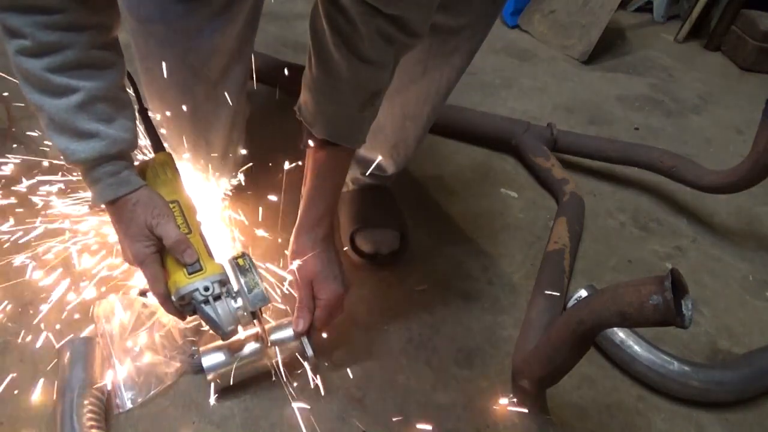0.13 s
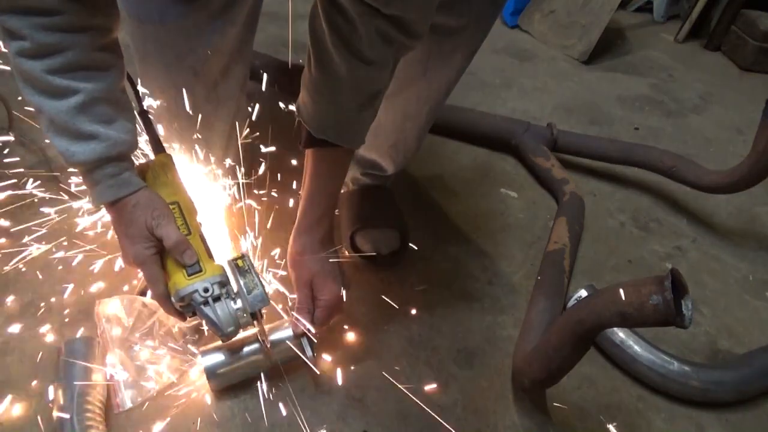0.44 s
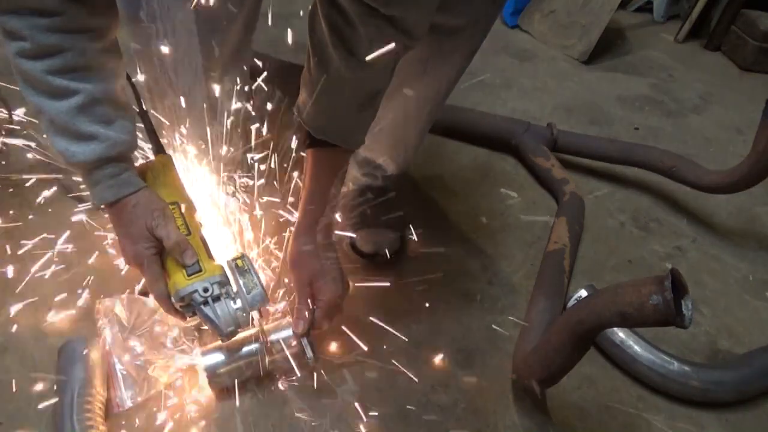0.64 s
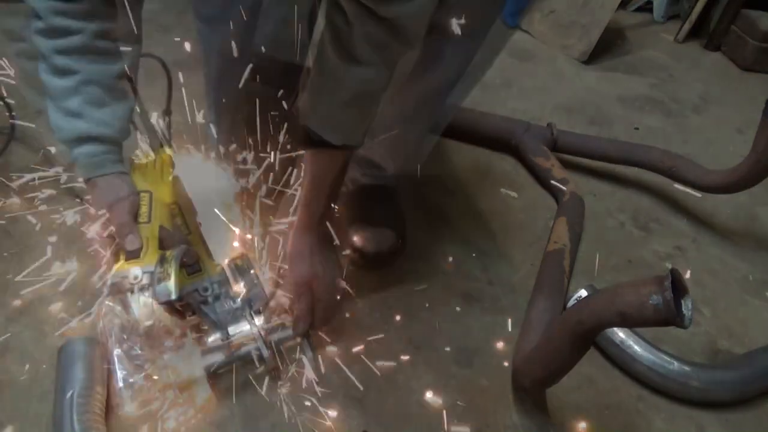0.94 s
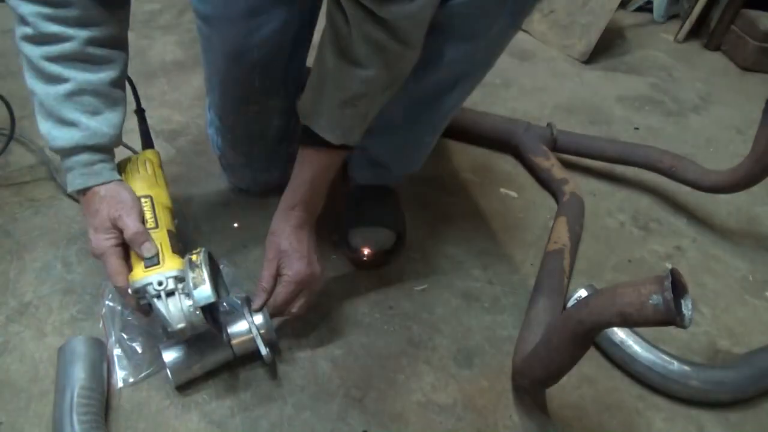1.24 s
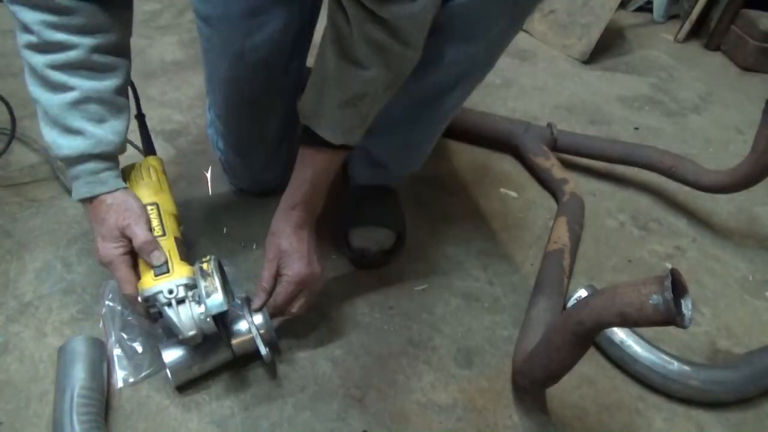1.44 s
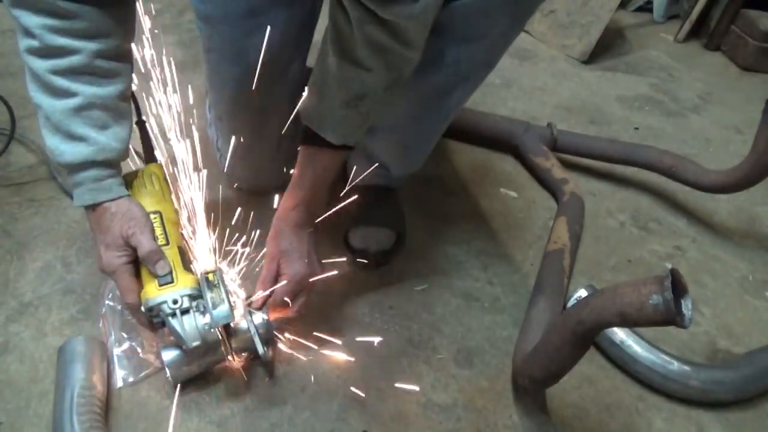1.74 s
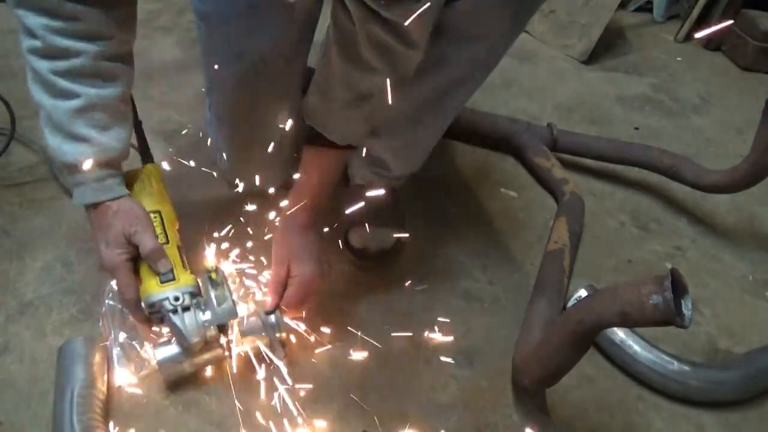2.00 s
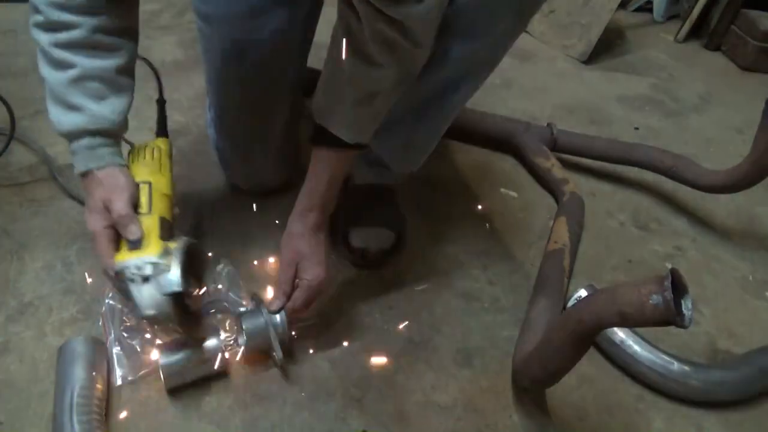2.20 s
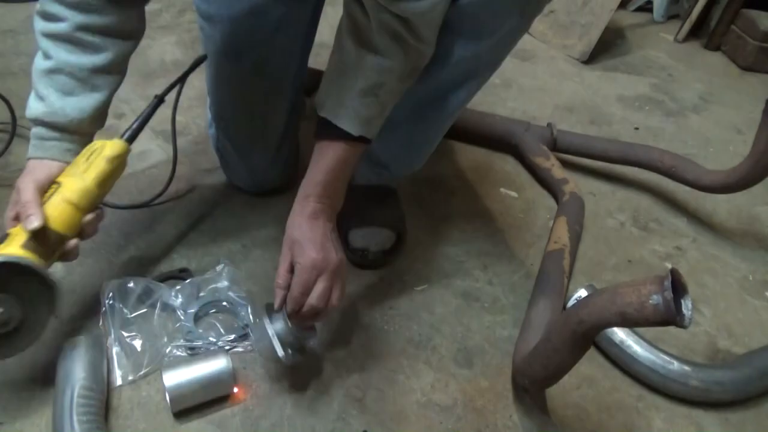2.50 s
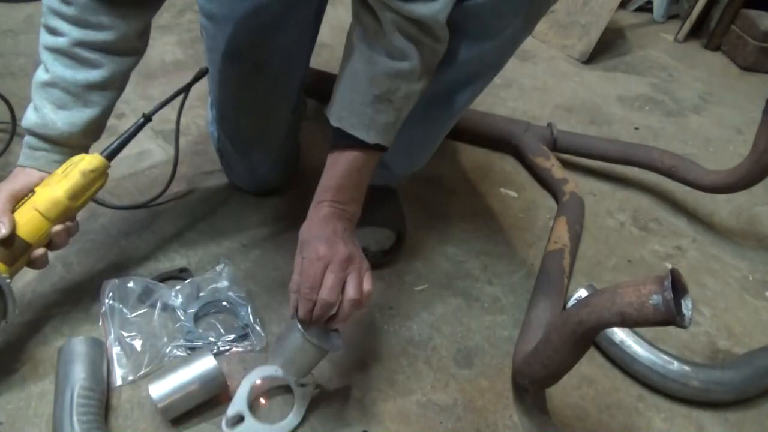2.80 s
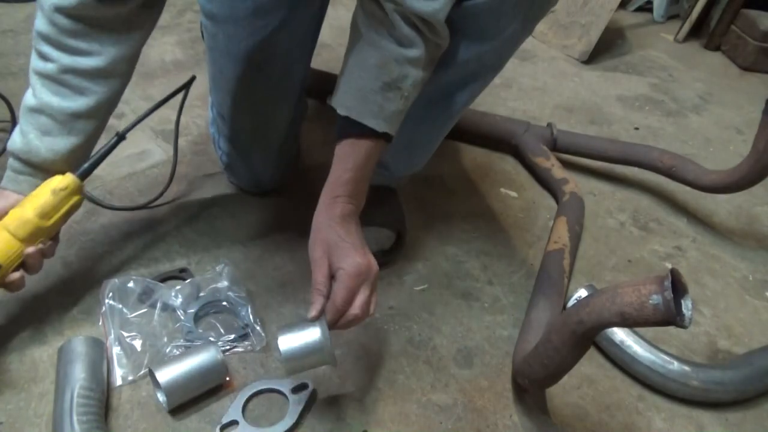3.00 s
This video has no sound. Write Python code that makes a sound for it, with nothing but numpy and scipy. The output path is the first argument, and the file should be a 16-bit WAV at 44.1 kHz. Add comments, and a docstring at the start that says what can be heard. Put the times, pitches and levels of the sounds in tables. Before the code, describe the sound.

Close up in a garage, gritty, bright steel cutting gives way to a rising motor whine, one short squealing bite, then rushing fan air and the bell-like clinks of metal pieces hitting the floor.

```python
"""A garage floor: an angle grinder cuts a steel pipe flange. A deep cut with the motor labouring dissolves
into a second pass: the motor speeds up, sags in one last bite, then runs free with its fan rushing.
Cutting is repeating rim grit and random chips through steel resonances; the motor is sines locked to its speed.
The freed pieces drop on the concrete as decaying modes and noise cracks; gain control ducks loud moments."""
import sys
import numpy as np
from scipy import signal
from scipy.fft import rfft, irfft
from scipy.io import wavfile
from scipy.ndimage import uniform_filter1d, map_coordinates

SR = 44100
rng = np.random.default_rng(int(sys.argv[2]) if len(sys.argv) > 2 else 0)


def to_wav(s):
    """Save 16-bit WAV."""
    ch = np.atleast_2d(s).T  # columns
    pcm = np.round(np.clip(ch, -1, 1) * 32767)  # PCM
    wavfile.write(sys.argv[1], SR, pcm.astype(np.int16))


N = 138915
TIME = np.arange(N) / SR
FREQS = np.maximum(np.fft.rfftfreq(N, 1 / SR), 1)
GEAR_RATIO = 3.565  # motor turns per wheel turn
GUARD_HZ, GUARD_WIDTH_HZ = 4805, 70


def from_db(db):
    """Decibels to gain."""
    return np.exp(np.asarray(db) * (np.log(10) / 20))


def rms_one(x):
    """Scale to rms 1."""
    return x / np.sqrt(np.mean(x ** 2) + 1e-20)


def in_time(rows):
    """Each column of a curve at every sample."""
    s, *columns = np.transpose(rows)
    return [np.interp(TIME, s, c) for c in columns]


def during(rows):
    """1 over the span of a curve, fading quickly outside it."""
    start, end = rows[0][0], rows[-1][0]
    return np.interp(TIME, [start - .06, start - .03, end + .03, end + .06], [0, 1, 1, 0])


def spell(start, end):
    """1 from start to end, with soft edges."""
    fade_s = .03
    return np.clip(np.minimum(TIME - start, end - TIME) / fade_s + .5, 0, 1)


def swells(rows):
    """Gain of a few bell-shaped swells."""
    return sum(from_db(db) * np.exp(-2 * ((TIME - s) / length) ** 2) for s, length, db in rows)


def at_hz(points):
    """A spectrum in dB at every frequency."""
    hz, db = np.transpose(points)
    return np.interp(np.log(FREQS), np.log(hz), db)


def bell(hz, width_hz):
    """Shape of a resonance, 1 on top."""
    return 1 / (1 + (2 * (FREQS - hz) / width_hz) ** 2)


def shaped(x, gain):
    """Filter by a gain per frequency; rms 1."""
    return rms_one(irfft(rfft(x) * gain, N))


def noise(gain):
    """Coloured noise of rms 1."""
    return shaped(rng.standard_normal(N), gain)


def drift(rate_hz):
    """Slow chance of spread 1, drawn at every 40th sample."""
    step = 40
    white = rng.standard_normal(4096)
    hz = np.fft.rfftfreq(len(white), step / SR)
    slow = rms_one(irfft(rfft(white) / (1 + (hz / rate_hz) ** 2)))
    return np.interp(np.arange(N) / step, np.arange(len(slow)), slow)


def motor_turns(speed, wobble=0.000844):
    """Turns of the motor since the start: the sum of a slightly unsteady speed."""
    return np.cumsum(in_time(speed)[0] * (1 + wobble * drift(23.7))) / SR


def wheel_throb(turns):
    """One sine cycle per turn of the geared-down wheel."""
    return np.sin(2 * np.pi * turns / GEAR_RATIO)


def rim(wheel_turns, memory, size):
    """Grit round the wheel's rim passes the steel once a turn, and wears a little each time."""
    memory = np.clip(memory, 0, .98)
    fresh = rng.standard_normal((int(wheel_turns[-1]) + 42, size))
    # one row per turn; 40 turns settle the filter
    grit = signal.lfilter([1], [1, -memory], fresh, axis=0)[40:].ravel()
    return rms_one(map_coordinates(grit, [wheel_turns * size], order=3, mode="nearest"))


def cut(turns, bite, colour, rings, squeals, throb_db, flutter_db, size):
    """Rim grit and a spray of chips excite the steel; the uneven wheel throbs once a turn."""
    spray_db = -6
    grit = rim(turns / GEAR_RATIO, .86, size)
    force = grit + from_db(spray_db) * rng.standard_normal(N)
    force = force * from_db(throb_db * wheel_throb(turns) + flutter_db * drift(39))
    body_db = at_hz(colour) + sum(db * bell(hz, width) for hz, width, db in rings)
    grinding = shaped(force, from_db(body_db)) * from_db(in_time(bite)[0]) * during(bite)
    return grinding + squeal(turns, squeals)


def squeal(turns, orders, slip_rad=.25):
    """High spots of the rim catch the steel at the same places on every turn, until they wear off."""
    angle = 2 * np.pi * turns / GEAR_RATIO
    total = 0
    for k, start, end, db in orders:
        tone = np.sin(round(k) * angle + slip_rad * drift(40))
        total = total + spell(start, end) * from_db(db) * tone
    return np.sqrt(2) * total


def deep_cut(turns):
    """First pass: rim grit through the resonances of pipe and wheel, with squeals at wheel multiples."""
    # Level of the wheel on the steel. Each row: time in seconds, level in dB.
    bite = [(0, -31), (.25, -30), (.5, -31), (.75, -29.5), (.95, -33.5), (1.1, -37), (1.28, -49)]
    # Colour of the grinding. Each row: frequency in Hz, level in dB.
    colour = [(50, -26), (110, -34), (300, -21), (900, -21), (1500, -17.5), (2200, -5.5), (3100, -2),
              (4300, -7.5), (5800, -2.5), (7500, 0.5), (9200, 2), (10500, -5), (12200, -9.5), (15800, -26)]
    # Resonances and the gaps between them. Each row: frequency in Hz, width in Hz, boost in dB.
    rings = [(2200, 50, 2), (3000, 140, 2.5), (3230, 120, 3.5), (3930, 200, 4), (4330, 350, -7),
             (4720, 180, 6), (5150, 400, -5), (5550, 170, 8.5), (6070, 90, 4), (6330, 120, -3),
             (6700, 160, 3), (7490, 90, 5), (8380, 80, 8), (9160, 170, 10), (9720, 330, -7),
             (10300, 400, 2), (11800, 100, 8), (12250, 550, -8), (12900, 380, 7)]
    # Squeals. Each row: multiple of the wheel rate, start in seconds, end in seconds, level in dB.
    squeals = [(13, 0, .15, -55), (19, .3, 1.0, -57), (20, .45, .9, -55), (26, 0, .3, -49),
               (31, .6, .8, -50), (50, .3, .65, -49), (55, .4, .62, -50), (57, .15, .45, -51),
               (83, .3, .95, -47), (89, 0, .35, -46)]
    return cut(turns, bite, colour, rings, squeals, throb_db=1, flutter_db=0.9, size=400)


def last_cut(turns):
    """Second pass: the same mechanism with a stronger throb and flutter and its own resonances."""
    # Level of the wheel on the steel. Each row: time in seconds, level in dB.
    bite = [(1.41, -69), (1.45, -48), (1.53, -34.5), (1.6, -33), (1.7, -35), (1.87, -33.5), (1.94, -36),
            (1.98, -63)]
    # Colour of the grinding. Each row: frequency in Hz, level in dB.
    colour = [(60, -26), (160, -24), (300, -20), (900, -18), (1600, -11), (2400, -1), (3000, 1.5),
              (3900, -3.5), (5000, -4), (6500, -2.5), (8700, 6.5), (10500, -3), (12500, -3.5), (15800, -15)]
    # Resonances and the gaps between them. Each row: frequency in Hz, width in Hz, boost in dB.
    rings = [(2460, 180, 4), (2980, 160, 3), (3220, 130, 4), (3550, 180, -4), (4250, 300, 3),
             (5480, 120, 7), (6430, 200, 5), (7440, 130, 7), (7750, 200, -4), (8110, 100, 4),
             (8790, 150, 3), (9080, 100, 4), (9450, 120, 3), (9930, 160, 4), (10550, 300, -3),
             (11150, 180, 6), (11550, 130, 5), (12100, 450, -5), (12620, 140, 8)]
    # Squeals. Each row: multiple of the wheel rate, start in seconds, end in seconds, level in dB.
    squeals = [(10, 1.68, 1.92, -50), (14, 1.59, 1.78, -48), (15, 1.72, 1.86, -46), (16, 1.84, 1.93, -47),
               (18, 1.59, 1.84, -42.5), (19, 1.7, 1.93, -45), (20, 1.82, 1.93, -45),
               (27, 1.69, 1.85, -47.5), (39, 1.67, 1.82, -48), (40, 1.72, 1.9, -42.5),
               (45, 1.64, 1.73, -45), (46, 1.76, 1.9, -48), (53, 1.67, 1.83, -44), (54, 1.55, 1.66, -47),
               (57, 1.8, 1.9, -45.5), (60, 1.67, 1.74, -45), (61, 1.73, 1.84, -46), (70, 1.66, 1.88, -50),
               (77, 1.66, 1.8, -53)]
    return cut(turns, bite, colour, rings, squeals, throb_db=2.5, flutter_db=1.4, size=270)


def chatter(turns, throb_db=4):
    """Short spells of the wheel's flank rattling in the slot: throbbing noise in a broad band."""
    # Spells of rattling. Each row: centre in seconds, length in seconds, level in dB.
    chatters = [(.04, 0.032, -48), (.17, .07, -43), (.26, .02, -47), (.296, 0.008, -34), (.345, .04, -43),
                (.587, 0.023, -39.5), (.72, 0.05, -39), (.776, 0.015, -35.5), (1.48, 0.018, -36.5),
                (1.625, 0.044, -37.5)]
    rattle = rng.standard_normal(N) * from_db(throb_db * wheel_throb(turns))
    return swells(chatters) * shaped(rattle, bell(2880, 2100) ** 2)


def singing(waver_db=1.5, slip_rad=.45):
    """Fixed-pitch modes of the nearly severed steel, kept ringing a little unevenly by the grit."""
    # Singing modes. Each row: start in seconds, end in seconds, frequency in Hz, level in dB.
    sings = [(1.6, 1.93, 3010, -45.5), (1.73, 1.96, 5480, -41), (1.655, 1.8, 8135, -43),
             (1.82, 1.92, 8110, -47), (1.78, 1.94, 7480, -49), (1.42, 1.54, 8740, -47),
             (1.92, 1.98, 8620, -46)]
    total = 0
    for start, end, hz, db in sings:
        level = spell(start, end) * from_db(db + waver_db * drift(30))
        total = total + level * np.sin(2 * np.pi * hz * TIME + slip_rad * drift(29))
    return np.sqrt(2) * total


def motor(turns, tones, third_db, waver_db=1.0, whine_waver_db=3.0, eighth_db=1):
    """Hum of the shaft and wheel, fan overtones, and the rough whine and hiss of the commutator."""
    commutator_bars = 25
    skirt_db, skirt_hz = -2, 130
    hiss_db = -7.5  # against the whine
    hum_db, whine_db, wheel_db = in_time(tones)
    angle = 2 * np.pi * turns
    orders = [(1, 0), (3, third_db), (8, eighth_db)]  # multiple of the shaft rate, dB
    hum = sum(from_db(hum_db + db + waver_db * drift(7.5)) * np.sin(k * angle) for k, db in orders)
    hum = hum + from_db(wheel_db) * wheel_throb(turns)
    bars = commutator_bars * angle
    whine = rms_one(np.sin(bars) + from_db(skirt_db) * drift(skirt_hz) * np.cos(bars))
    whine = whine + from_db(hiss_db) * noise(bell(13000, 4000) ** 2)
    whine = whine * from_db(whine_db + whine_waver_db * drift(20))
    return (np.sqrt(2) * hum + whine) * during(tones)


def motors(deep, last):
    """The motor in both passes: shaft-locked tones, the third overtone far stronger in the last."""
    # Tones of the deep cut. Each row: time in seconds, hum in dB, whine in dB, wheel unbalance in dB.
    deep_tones = [(0, -59.5, -47, -85), (.2, -56.5, -61, -83), (.45, -62, -65, -77), (.85, -61, -49, -80),
                  (1.1, -69.5, -63, -98), (1.28, -71, -78, -98)]
    # Tones of the last pass. Each row: time in seconds, hum in dB, whine in dB, wheel unbalance in dB.
    last_tones = [(.76, -79, -80, -93), (.83, -59, -58, -88), (1.2, -57.5, -53, -92),
                  (1.45, -59, -59, -103), (1.65, -65, -63, -96), (1.88, -63.5, -49, -71),
                  (2.0, -59, -51, -95), (2.25, -57, -51, -97), (2.45, -58.5, -50, -81.5),
                  (2.8, -57.5, -50, -78), (3.15, -56.5, -45, -78)]
    return motor(deep, deep_tones, third_db=-21) + motor(last, last_tones, third_db=-2.5)


def rush(turns, flutter_db=.5, throb_db=0.94):
    """Air from the fan and spinning wheel as coloured noise, duller when the tool is turned away."""
    # Strength of the rush. Each row: time in seconds, level in dB, change of the treble in dB.
    course = [(0, -31, -7), (.17, -33, -6), (.3, -35.5, -6), (.7, -37.5, 1), (.9, -32.5, -2),
              (1.22, -30.5, -0.5), (1.45, -32, 0.5), (1.58, -33.5, 0), (1.7, -36.5, 4), (1.9, -36.5, 1.5),
              (1.98, -31, -2), (2.17, -32, -0.5), (2.27, -31, -2), (2.36, -32, -3), (2.46, -29, -7),
              (2.64, -30.5, -8.5), (2.82, -30, -6.5), (3.15, -26, -6)]
    # Colour of the air. Each row: frequency in Hz, level in dB.
    colour = [(25, -52), (60, -35.5), (130, -33), (260, -27.5), (450, -21), (780, -16.5), (1020, -16),
              (1270, -7.5), (1580, -8.5), (2100, -5), (2800, 2.5), (3900, -3), (5000, 0.5), (7000, 2.5),
              (9000, -2), (11200, -5.5), (12600, -19), (15800, -17.5)]
    treble_hz, guard_boost_db = 5180, 1.5
    level_db, treble_db = in_time(course)
    air = noise(from_db(at_hz(colour) + guard_boost_db * bell(GUARD_HZ, GUARD_WIDTH_HZ)))
    low = irfft(rfft(air) / (1 + (FREQS / treble_hz) ** 4), N)
    swirl_db = flutter_db * drift(22) + throb_db * wheel_throb(turns)
    return (low + (air - low) * from_db(treble_db)) * from_db(level_db + swirl_db)


def guard(turns, throb_db=3):
    """Air between wheel and guard roars, throbbing once a turn; the guard's resonance rings in noise."""
    # Roars of the free wheel. Each row: centre in seconds, length in seconds, level in dB.
    roars = [(2.34, 0.026, -39), (2.465, 0.083, -39.5), (2.6, 0.042, -40)]
    # Swells of the guard's ring. Each row: centre in seconds, length in seconds, level in dB.
    guard_rings = [(1.24, .08, -39), (2.08, .06, -46)]
    throb = rms_one(from_db(throb_db * wheel_throb(turns)))
    roar = swells(roars) * throb * noise(bell(2960, 2000) ** 2)
    return roar + swells(guard_rings) * noise(bell(GUARD_HZ, GUARD_WIDTH_HZ))


def ring(times, levels_db, hz, t60_s):
    """One mode; every touch gives it a new swing, which then dies away."""
    hand_over_s = 0.00031  # a touch changes the swing this fast
    swing = np.zeros(N)
    for s, db in zip(times, levels_db):
        swing = np.where(TIME >= s, from_db(db - 60 * np.maximum(TIME - s, 0) / t60_s), swing)
    lag = np.exp(-1 / (hand_over_s * SR))
    swing = signal.lfilter([1 - lag], [1, -lag], swing)
    return np.sqrt(2) * swing * np.sin(2 * np.pi * (hz * TIME + rng.random()))


def knocks(times, levels_db, colour, t60_s):
    """Short cracks of steel on concrete: decaying coloured noise."""
    burst = np.zeros(N)
    for s, db in zip(times, levels_db):
        burst += (TIME >= s) * from_db(db - 60 * np.maximum(TIME - s, 0) / t60_s)
    return irfft(rfft(burst * rng.standard_normal(N)) * rms_one(from_db(at_hz(colour))), N)


def stub():
    """The cut-off pipe stub bounces and rings like a small bell; each touch resets its mode families."""
    # Modes. Each row: frequency in Hz, t60 in seconds, level in dB, family whose strength it shares.
    modes = [(5785, .6, 0, 0), (6423, .8, -2, 1), (7084, .3, 1, 2), (7047, .35, -9, 2), (7935, .15, -19, 2),
             (10163, .5, 1.5, 3), (11565, .3, -17, 3), (13087, .3, -25, 3), (13970, .3, -26, 3)]
    # Touches on the floor. Each row: time in seconds, click in dB, strengths of families 0 to 3 in dB.
    hits = [(2.739, -40, -55, -43, -37, -56), (2.760, -34, -37, -43, -43, -52),
            (2.877, -32, -30, -30, -30, -37), (2.888, -31, -30, -22, -27, -26),
            (2.913, -27, -31, -22, -25, -29), (2.977, -25, -33, -23, -24, -26),
            (2.991, -29, -21, -22, -34, -22), (3.067, -24, -31, -22, -23, -26),
            (3.112, -36, -40, -29, -34, -37)]
    # Colour of the clicks. Each row: frequency in Hz, level in dB.
    click_colour = [(100, -37), (600, -12.5), (2000, -28), (7000, 7), (11000, -39), (15000, -18)]
    s, click_db, *families = np.transpose(hits)
    rings = sum(ring(s, families[int(round(family))] + db, hz, t60_s) for hz, t60_s, db, family in modes)
    return rings + knocks(s, click_db, click_colour, t60_s=0.15)


def flange():
    """The flange lands on its edge and falls flat, clacking with a lower modal ring."""
    # Landings. Each row: time in seconds, ring in dB, clack in dB.
    hits = [(2.819, -42, -39), (2.876, -36.5, -56), (2.915, -28, -48), (2.981, -40, -50), (3.059, -45, -35)]
    # Modes. Each row: frequency in Hz, t60 in seconds, level in dB.
    modes = [(2976, 0.46, 0.5), (3040, 0.37, -24), (4500, .4, -11.5), (4580, 0.27, -22), (5330, 0.27, -13)]
    # Colour of the clacks. Each row: frequency in Hz, level in dB.
    clack_colour = [(60, -55), (600, -36), (1700, -1), (3000, -2), (8000, -20), (14000, -34)]
    s, ring_db, clack_db = np.transpose(hits)
    rings = sum(ring(s, ring_db + db, hz, t60_s) for hz, t60_s, db in modes)
    return rings + knocks(s, clack_db, clack_colour, t60_s=0.027)


def garage(sources):
    """Each source from its own place, and a short diffuse tail of its own in each channel."""
    # Left minus right. Each row: frequency in Hz, difference in dB.
    balance = [(100, 0), (700, 0.6), (2800, 0), (5500, 1.8), (9000, 1.8), (13000, 0.5)]
    room_db, room_t60_s, low_cut_hz = -16, 0.19, 180
    out, age = [], TIME[:SR // 2]
    for side in (1, -1):
        direct = rfft(sum(x * from_db(side * pan_db / 2) for x, pan_db in sources))
        tail = rng.standard_normal(len(age)) * from_db(-60 * age / room_t60_s) * (age > .003)
        room = rfft(tail / np.linalg.norm(tail), N) * from_db(room_db)
        room = room * FREQS / np.hypot(FREQS, low_cut_hz)
        out.append(irfft(direct * (1 + room) * from_db(side * at_hz(balance) / 2), N))
    return np.array(out)


def scene():
    """Both passes of the grinder and the falling pieces, in the garage."""
    # Motor speed in the deep cut. Each row: time in seconds, speed in turns per second.
    deep_speed = [(0, 418), (.15, 406), (.3, 398), (.6, 393), (.8, 387), (1.0, 381), (1.25, 389)]
    # Motor speed in the last pass. Each row: time in seconds, speed in turns per second.
    last_speed = [(.7, 476), (.88, 526), (1.0, 549.5), (1.21, 579.5), (1.43, 596.5), (1.6, 601), (1.7, 590),
                  (1.95, 557), (2.08, 576), (2.2, 588), (2.41, 602), (2.7, 614), (3.15, 622)]
    deep, last = motor_turns(deep_speed), motor_turns(last_speed)
    cutting = deep_cut(deep) + last_cut(last) + chatter(deep) + singing()
    air = rush(last) + guard(last)
    pieces = stub() + flange()
    # each with its place to the left of the overall balance in dB
    return garage([(cutting, -0.6), (air, 1.5), (motors(deep, last), 0.5), (pieces, 1)])


def record(dry):
    """Gain control takes down any excess over a threshold, then recovers at a fixed rate; the top is cut."""
    threshold_db, release_db_per_s, window_s = -27.7, 86, 0.0073
    cutoff_hz = 15850
    power = uniform_filter1d(np.mean(dry ** 2, axis=0), size=max(int(window_s * SR), 2))
    over_db = np.maximum(10 * np.log10(np.maximum(power, 1e-12)) - threshold_db, 0)
    recovery_db = release_db_per_s * TIME
    held_db = np.maximum.accumulate(over_db + recovery_db) - recovery_db
    held_db = uniform_filter1d(held_db, size=100)
    return irfft(rfft(dry * from_db(-held_db)) / np.sqrt(1 + (FREQS / cutoff_hz) ** 400), N)


dry = scene()
out = record(dry)
to_wav(out)
```